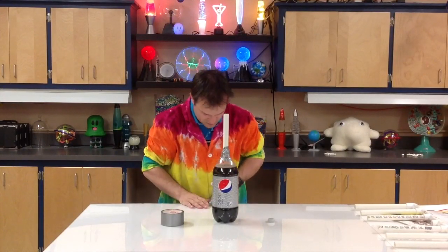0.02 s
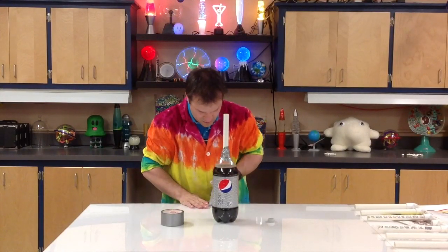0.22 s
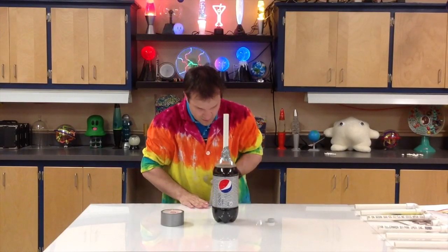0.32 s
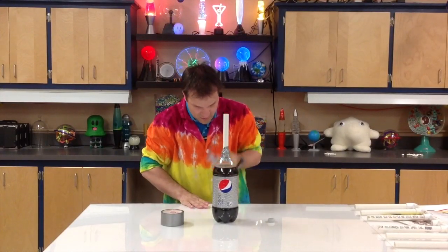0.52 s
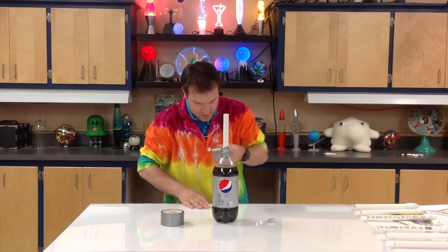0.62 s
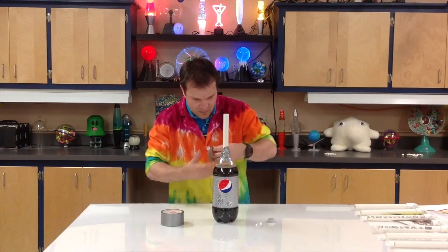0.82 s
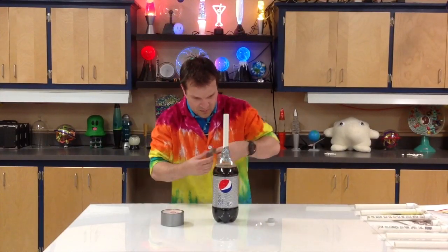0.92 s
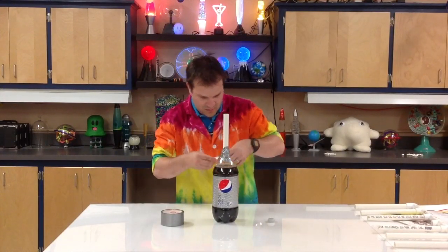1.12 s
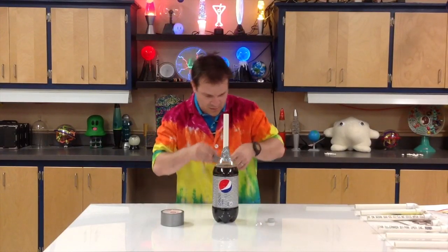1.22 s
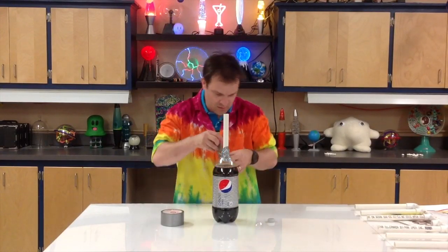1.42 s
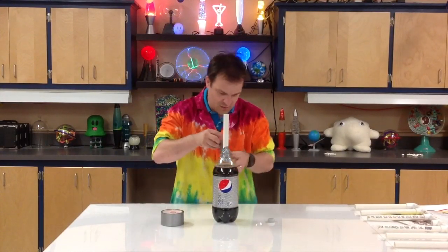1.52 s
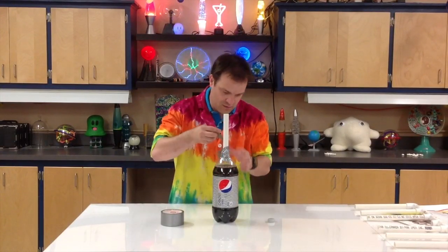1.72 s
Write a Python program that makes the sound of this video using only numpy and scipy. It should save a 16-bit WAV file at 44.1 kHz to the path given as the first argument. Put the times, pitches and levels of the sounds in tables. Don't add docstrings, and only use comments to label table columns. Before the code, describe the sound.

After faint finger touches, strong tape is torn loose in several brief, bright, snapping jerks with short room echoes; then near quiet, low hum and air rumble, and a few soft sticky crackles near the end.

```python
import sys
import numpy as np
from scipy import signal
from scipy.fft import rfft, irfft, next_fast_len
from scipy.io import wavfile
from scipy.ndimage import map_coordinates

SR = 44100
rng = np.random.default_rng(int(sys.argv[2]) if len(sys.argv) > 2 else 0)


def waveform_to_disk(signal):
    frames = np.transpose(np.atleast_2d(signal))
    scaled = np.clip(frames, -1, 1) * 32767
    samples = np.round(scaled).astype(np.int16)
    wavfile.write(sys.argv[1], SR, samples)


def to_linear_factor(level_db):
    exponent = np.asarray(level_db, float) / 20
    return 10 ** exponent


N = 79380


def unit(x):
    return x / np.sqrt(np.mean(x ** 2) + 1e-20)


def along(points, hz):
    f, value = np.transpose(points)
    return np.interp(np.log(hz + 1), np.log(f + 1), value)


def filtered(x, response):
    size = next_fast_len(len(x) + 4096)
    f = np.fft.rfftfreq(size, 1 / SR)
    return irfft(rfft(x, size) * response(f), size)[:len(x)]


def resonance(f, hz, width):
    return 1j * f * width / (hz * hz - f * f + 1j * f * width)


def low_cut(f, corner_hz):
    return (1j * f / (corner_hz + 1j * f)) ** 2


def wobble(rate):
    knots = rng.standard_normal(int(N * rate / SR) + 4)
    return map_coordinates(knots, [np.arange(N) * rate / SR])


def shaped_noise(points):
    return unit(filtered(rng.standard_normal(N), lambda f: to_linear_factor(along(points, f))))


def lamp_hum():
    # f/Hz, level/dB
    overtones = [(119.9, -77.5), (239.8, -75.5), (359.6, -61.5), (479.5, -67), (719.2, -88.5)]
    t = np.arange(N) / SR
    total = np.zeros(N)
    for hz, db in overtones:
        level = to_linear_factor(db + 4.5 + 0.4 * wobble(5.1))
        total += level * np.sin(2 * np.pi * (hz * t + rng.random()))
    return total


def lamp_whine():
    whine_hz, width_hz, whine_db = 3750, 200, -85
    band = filtered(rng.standard_normal(N), lambda f: resonance(f, whine_hz, width_hz) ** 2)
    return to_linear_factor(whine_db + 1.1 * wobble(11.2)) * unit(band)


def ventilation():
    # f/Hz, level/dB
    rumble = [(30, -52), (90, -16), (130, -3.5), (220, -3.5), (300, -9.5), (450, -12.5), (700, -39),
              (1200, -40.5)]
    return to_linear_factor(-66.5 + 1.1 * wobble(6.9)) * shaped_noise(rumble)


def microphone_hiss():
    # f/Hz, level/dB
    hiss = [(470, -3), (800, -5), (1010, -7), (1100, -7), (1660, -8), (3820, -11.5), (15500, -13)]
    return to_linear_factor(-67.5 + 0.26 * wobble(5.7)) * shaped_noise(hiss)


def old_echo():
    start_db, t60_s, pitch_hz, width_hz = -62.5, 0.62, 473, 400
    echo = unit(filtered(rng.standard_normal(N), lambda f: resonance(f, pitch_hz, width_hz)))
    return to_linear_factor(start_db - 60 * np.arange(N) / SR / t60_s) * echo


def room(x):
    # f/Hz, t/s
    decay = [(200, 0.21), (700, 0.42), (1500, 0.39), (3000, 0.44), (6000, 0.37), (10000, 0.39),
             (16000, 0.32)]
    # f/Hz, level/dB
    tilt = [(300, 13.5), (1500, 0.5), (15000, -1.5)]
    room_db, gap_s = -3, 0.0034
    hz, t, cells = signal.stft(rng.standard_normal(SR * 3 // 5), SR, nperseg=256)
    fall_db = -60 * t / along(decay, hz)[:, None]
    level = to_linear_factor(fall_db + along(tilt, hz)[:, None])
    tail = signal.istft(cells * level, SR, nperseg=256)[1]
    tail = tail * np.clip(np.arange(len(tail)) / SR / gap_s, 0, 1) ** 2
    return signal.fftconvolve(x, to_linear_factor(room_db) * tail / np.linalg.norm(tail))


def add_with_room(out, start_s, sound):
    start = round(start_s * SR)
    for part in (sound, room(sound)):
        out[start:start + len(part)] += part


def snaps(pull, rate, scatter_db, sizzle, signs):
    first_snap_s = 0.00071
    chance = rng.random(len(pull))
    size = rng.exponential(size=len(pull))
    grain = rng.standard_normal(len(pull))
    hits = chance < rate / SR
    hits[round(first_snap_s * SR)] = True
    clicks = rng.choice(signs, len(pull)) * hits * to_linear_factor(scatter_db * np.minimum(size, 2))
    push = pull * (clicks * np.sqrt(SR / rate) / 2 + sizzle * grain)
    return push * np.sqrt(np.sum(pull ** 2) / np.sum(push ** 2))


def table_top(f):
    # f/Hz, width/Hz, level/dB
    modes = [(218, 48, -1), (300, 22, 3.5), (519, 150, -5.5), (720, 51, -3.5), (1000, 280, 1.5)]
    total = 0
    for k, (hz, width_hz, db) in enumerate(modes):
        total = total + (-1) ** k * to_linear_factor(db) * resonance(f, hz, width_hz)
    return low_cut(f, 200) * total


def peel(rows, thump_db, strip_db):
    # f/Hz, level/dB
    crackle = [(500, -29), (1500, 2), (4000, 1), (6300, -2), (8500, -3), (11000, 1.5), (14000, -2),
               (16000, -1)]
    attack_s, release_s, sag_db_per_s = 0.00013, 0.0012, 133
    strip_q = 2.4
    out, t = np.zeros(N + SR), np.arange(SR // 8) / SR
    for start_s, length_s, db, hz, ring_db in rows:
        pull = np.clip(t / attack_s, 0, 1) * to_linear_factor(-sag_db_per_s * t)
        pull = pull * np.exp(-np.maximum(t - length_s, 0) / release_s)
        clumps = to_linear_factor(1.5 * wobble(900)[:len(t)])
        fine = snaps(pull * clumps, 10000, 2.5, 0.6, [-1, 1])
        big = snaps(pull, 2600, 2, 0.5, [-1, -1])
        ticks = filtered(fine, lambda f: to_linear_factor(along(crackle, f)))
        thump = filtered(big, lambda f: to_linear_factor(thump_db) * table_top(f))
        ring = filtered(big, lambda f: resonance(f, hz, hz / strip_q) ** 2)
        rip = ticks + thump + to_linear_factor(ring_db + strip_db) * ring
        add_with_room(out, start_s, to_linear_factor(db) * rip)
    return out[:N]


def touches():
    # t/s, length/s, level/dB, strip f/Hz, strip ring over crackle level/dB
    handling = [(.103, .003, -64.5, 2000, 0.5), (.114, 0.0062, -72.5, 11200, 0),
                (.12, 0.075, -64.5, 1000, -4), (.115, 0.0078, -77, 1820, 9), (.1405, .002, -63, 3180, -0.5),
                (.166, 0.0035, -63, 11000, -11), (.176, 0.011, -66, 11000, -6),
                (.189, 0.0086, -65, 12500, -3), (1.219, 0.0099, -63, 3570, -11),
                (1.228, 0.068, -69, 1100, -2), (1.29, 0.078, -72, 4540, -8),
                (1.262, 0.015, -67, 13900, -13), (1.36, 0.086, -67, 4060, -15),
                (1.568, 0.017, -57, 3300, -4.5), (1.569, 0.047, -67.5, 5660, 2),
                (1.578, 0.016, -56, 14000, -9), (1.607, 0.0055, -71, 10500, 4),
                (1.61, 0.058, -71, 2500, -17)]
    return peel(handling, thump_db=-31, strip_db=14)


def rips():
    # t/s, length/s, level/dB, strip f/Hz, strip ring over crackle level/dB
    pulls = [(.199, 0.0092, -39, 2470, 11), (.2055, 0.0045, -35.5, 2920, -22),
             (.2266, 0.0051, -31.5, 3100, -12), (.2348, 0.00067, -55, 5840, 9),
             (.2415, .0105, -39, 2000, 14), (.212, 0.017, -44.5, 3240, 0),
             (.2365, 0.0048, -41.5, 6100, -21), (.253, 0.02, -45.5, 2200, -9),
             (.2682, 0.0045, -32, 2100, -2), (.2728, 0.0055, -39.5, 1970, -1),
             (.2795, 0.0061, -38, 1990, -16), (.3272, 0.0052, -39, 1910, -15),
             (.3315, 0.012, -45, 2000, 14), (0.398, 0.0021, -53, 3000, 13), (0.403, 0.0022, -45.5, 3500, 3),
             (.450, 0.0022, -32, 1810, -6), (.4542, 0.0078, -41, 1470, 11.5),
             (.4612, 0.014, -33.5, 2360, -30), (.469, 0.012, -41, 1230, 7.5), (.477, 0.0084, -34, 1660, 4),
             (.487, 0.0059, -44.5, 1500, -4), (.494, 0.003, -50, 1470, 12), (.198, 0.007, -52, 12100, 17),
             (.229, 0.021, -41.5, 12600, -4), (.241, 0.019, -48.5, 12700, 8), (.4545, 0.011, -46, 12000, 3)]
    return peel(pulls, thump_db=3.5, strip_db=1.5)


def knocks(rows):
    out, t = np.zeros(N + SR), np.arange(SR // 8) / SR
    for start_s, db, hz, width_hz in rows:
        fade = np.exp(-np.pi * width_hz * t) * (1 - np.exp(-4 * hz * t))
        blow = -to_linear_factor(db) * np.sin(2 * np.pi * hz * t) * fade
        blow = filtered(blow, lambda f: low_cut(f, hz / 2))
        add_with_room(out, start_s, blow)
    return out[:N]


def table_jolts():
    # t/s, level/dB, f/Hz, width/Hz
    jolts = [(.1995, -37.5, 307, 41), (.1995, -35, 732, 42), (.2005, -46, 214, 28), (0.21, -48, 227, 72),
             (.245, -34.5, 1250, 46), (0.34, -48, 165, 38), (.328, -42.5, 300, 36), (.328, -31, 995, 116),
             (.463, -52, 74, 45), (.452, -32, 980, 160), (0.54, -46.5, 310, 135), (1.575, -44, 1130, 300),
             (1.7, -64, 1420, 200), (1.29, -59, 717, 63), (1.598, -49.5, 590, 240)]
    return knocks(jolts)


def loud_cracks():
    # t/s, level/dB, f/Hz, width/Hz
    first_pulls = [(0.2003, -22.3, 7580, 1500), (0.2007, -15, 2590, 1200), (0.2024, -16, 2830, 600),
                   (0.2039, -21.2, 6210, 1500), (0.2042, -21.2, 5520, 1500), (0.2069, -22.7, 8010, 1500),
                   (0.2077, -23.8, 6560, 1090), (0.2098, -26.9, 2770, 450), (0.2278, -23.5, 2240, 510),
                   (0.2303, -32.1, 7910, 400), (0.2311, -15.9, 2140, 850), (0.2315, -18.1, 3540, 1500),
                   (0.2316, -23.5, 6300, 1270), (0.235, -19.3, 6210, 1500), (0.2372, -24.1, 8720, 1500),
                   (0.242, -22.7, 2240, 700), (0.2421, -19.1, 5770, 1500), (0.2432, -29.4, 6360, 400),
                   (0.2441, -17.9, 1790, 1040), (0.2455, -20.5, 4400, 1500), (0.2481, -31.2, 3530, 310),
                   (0.2486, -28.4, 2400, 300), (0.2489, -30.8, 6200, 380), (0.2505, -21.1, 6460, 1500),
                   (0.2512, -24, 1800, 900), (0.2689, -21.5, 6050, 1500), (0.269, -13.1, 1730, 1000),
                   (0.2694, -24.6, 8110, 1270), (0.2696, -22, 3610, 1200), (0.2701, -29.3, 5500, 510),
                   (0.2707, -26.4, 3790, 310), (0.2711, -17.2, 3810, 1270), (0.2716, -17, 2320, 1200),
                   (0.2717, -22.0, 5670, 1500), (0.2732, -17.4, 2140, 400), (0.2766, -16.2, 2160, 1230),
                   (0.2769, -31.3, 6560, 350), (0.2788, -23.4, 2080, 480), (0.2824, -22.6, 2140, 850),
                   (0.3273, -17.2, 1300, 760), (0.3278, -22, 2900, 1200), (0.3279, -29.1, 5240, 550),
                   (0.3312, -23.8, 1980, 640), (0.3318, -28, 5200, 600), (0.3349, -22.7, 6460, 1090),
                   (0.335, -21.3, 2000, 700), (0.337, -28.2, 8440, 960), (0.3374, -18.3, 1890, 1090),
                   (0.3994, -30, 3140, 1500)]
    # t/s, level/dB, f/Hz, width/Hz
    long_pull = [(0.4503, -21.5, 8270, 1500), (0.4504, -11.3, 1730, 1000), (0.4508, -26.9, 3890, 450),
                 (0.4522, -19, 1150, 600), (0.4544, -22.8, 5770, 960), (0.4544, -13.8, 1790, 1040),
                 (0.4581, -17.9, 1890, 960), (0.462, -13.4, 1370, 800), (0.462, -13.4, 2830, 1090),
                 (0.4636, -29.1, 3950, 300), (0.4636, -12.7, 2160, 1230), (0.4656, -24.2, 5670, 850),
                 (0.4661, -19.8, 1650, 450), (0.4687, -18.1, 1370, 800), (0.469, -21.1, 8440, 1500),
                 (0.4696, -27.0, 6990, 480), (0.4701, -18.5, 940, 570), (0.4701, -18.2, 3870, 1500),
                 (0.4723, -19.6, 1710, 640), (0.4727, -19.9, 5340, 1500), (0.4756, -23.2, 6360, 960),
                 (0.4764, -14.1, 2910, 1270), (0.4782, -27.5, 5870, 480), (0.4785, -13.9, 1470, 850),
                 (0.4815, -20.1, 2000, 590), (0.4822, -17.8, 1730, 770), (0.4833, -19.1, 6200, 1500),
                 (0.4836, -24.1, 4750, 770), (0.484, -28.8, 8110, 430), (0.4854, -25.5, 6130, 700),
                 (0.4859, -16.3, 1570, 850), (0.4869, -22, 6790, 1500), (0.4883, -21.0, 6560, 1270),
                 (0.4906, -24.5, 8700, 1090), (0.4911, -19.2, 1300, 640), (0.4945, -12.6, 1630, 950),
                 (0.4976, -19, 1300, 400)]
    return to_linear_factor(-1.5) * knocks(first_pulls + long_pull)


def soft_cracks():
    # t/s, level/dB, f/Hz, width/Hz
    weak_snaps = [
        (1.2205, -53, 3620, 700),
        (1.2275, -51, 1400, 700),
        (1.5735, -40, 3050, 900),
        (1.583, -46, 2880, 700),
        (1.5685, -36.5, 6100, 1180),
        (1.593, -37, 5300, 1000),
        (1.6025, -38.5, 2120, 454),
    ]
    return knocks(weak_snaps)


def scene():
    background = lamp_hum() + lamp_whine() + ventilation() + microphone_hiss() + old_echo()
    tape = touches() + rips() + loud_cracks() + soft_cracks()
    return (background + tape + table_jolts())[None]


def low_pass(x):
    return signal.sosfilt(signal.butter(12, 16110, fs=SR, output="sos"), x)


def record(dry):
    top_hz = 15280
    mix = filtered(dry[0], lambda f: low_cut(f, 90) * (f < top_hz))
    return low_pass(mix[None])


dry = scene()
out = record(dry)
waveform_to_disk(out)
```